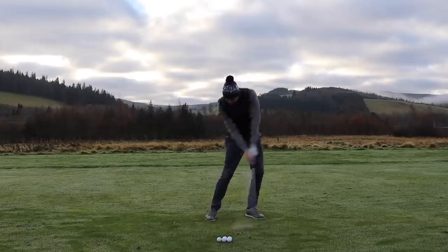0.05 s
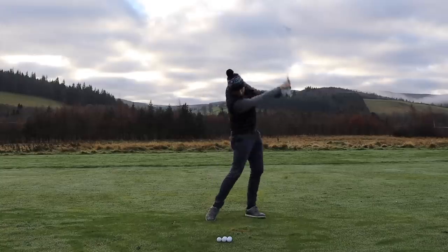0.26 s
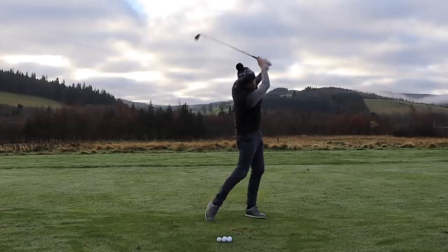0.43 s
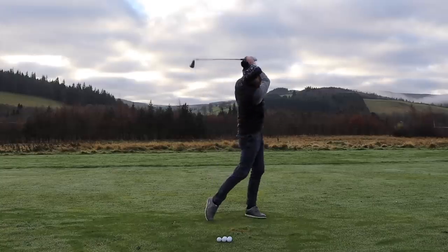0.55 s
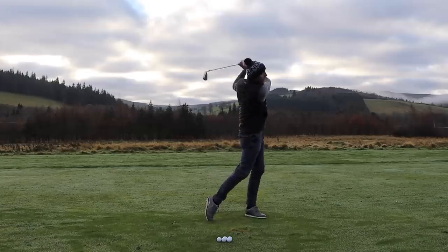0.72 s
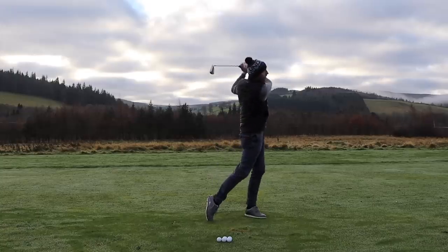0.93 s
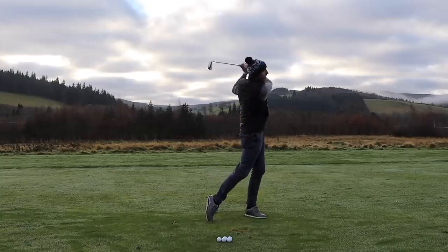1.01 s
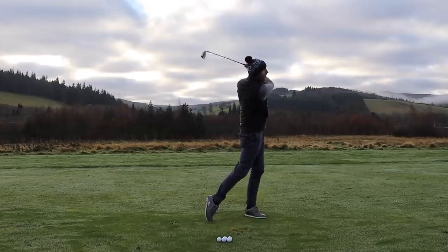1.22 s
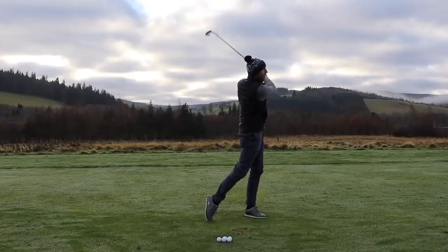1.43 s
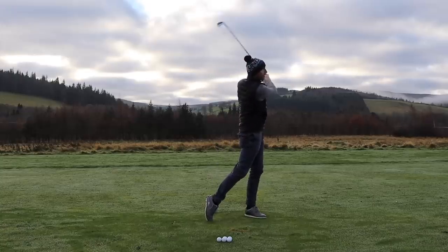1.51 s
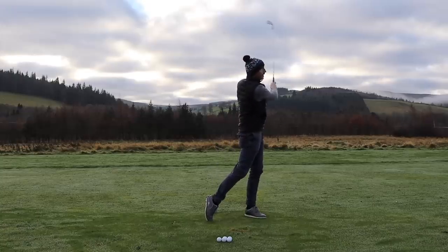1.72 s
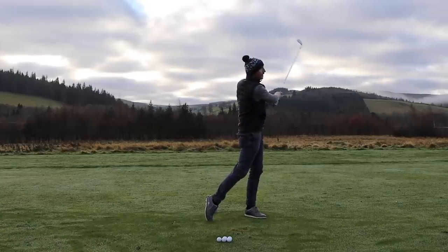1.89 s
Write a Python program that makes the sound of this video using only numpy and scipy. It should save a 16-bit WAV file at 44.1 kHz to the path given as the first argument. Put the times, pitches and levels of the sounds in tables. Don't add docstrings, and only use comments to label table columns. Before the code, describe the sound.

A golf iron cracks sharply into a ball and rips turf, with jacket rustle around it.

```python
import sys
import numpy as np
from scipy import signal
from scipy.io import wavfile
from scipy.ndimage import uniform_filter1d

SR = 44100
rng = np.random.default_rng(int(sys.argv[2]) if len(sys.argv) > 2 else 0)


def unload_audio(sound):
    columns = np.transpose(np.atleast_2d(sound))
    steps = np.round(np.clip(columns, -1, 1) * 32767)
    wavfile.write(sys.argv[1], SR, steps.astype(np.int16))


def how_loud(loudness_db):
    steps = np.asarray(loudness_db, float) / 20
    return 10 ** steps


N = 85995


def noise(n=N):
    return rng.standard_normal(n)


def evened(x):
    return x / np.sqrt(np.mean(x ** 2) + 1e-20)


def along(table, column):
    t_s, values = np.array(table)[:, [0, column]].T
    return np.interp(np.arange(N) / SR, t_s, values)


def add(mix, start_s, sound):
    part = mix[round(start_s * SR):][:len(sound)]
    part += sound[:len(part)]


def passed(x, hz, kind):
    b, a = signal.butter(2, hz, kind, fs=SR)
    return signal.lfilter(b, a, x)


def coloured(x, points, patchy_db=0., size=512):
    overlap = size * 3 // 4
    hz, _, z = signal.stft(x, SR, nperseg=size, noverlap=overlap)
    point_hz, point_db = np.transpose(points)
    shape_db = np.interp(np.log(hz + 1), np.log(point_hz + 1), point_db)
    patches = uniform_filter1d(rng.standard_normal(z.shape), size=6, axis=0)
    patches = evened(uniform_filter1d(patches, size=16, axis=1))
    z = z * how_loud(shape_db[:, None] + patchy_db * patches)
    return evened(signal.istft(z, SR, nperseg=size, noverlap=overlap)[1][:len(x)])


def resonate(x, hz, width_hz):
    carrier = np.exp(2j * np.pi * np.cumsum(hz) / SR)
    pole = np.exp(-np.pi * width_hz / SR)
    smooth = signal.lfilter([1 - pole], [1, -pole], x / carrier)
    return 2 * (carrier * smooth).real


def road():
    # f/Hz, level/dB
    tyre_spectrum = [(30, -38.5), (100, -9.5), (190, -21), (520, -18.5), (730, -5.5), (980, -5),
                     (1450, -25), (5000, -59)]
    # f/Hz, level/dB
    air_spectrum = [(500, -40.5), (1500, -7), (2300, -10.5), (3600, 1.5), (7000, -6), (12000, -14.5),
                    (15800, -27)]
    tyres = coloured(noise(), tyre_spectrum, patchy_db=0.24, size=2048)
    air = coloured(noise(), air_spectrum, patchy_db=2.25)
    return how_loud(-53.5) * tyres + how_loud(-65.5) * air


def jacket():
    # t/s, rustle level/dB, heavy-fold share/dB, crispness/dB
    body_turn = [(0, -48, 8, 1), (.05, -46.5, 0, 2.5), (.115, -35, -3.5, 0.5), (.15, -36, 4.5, 3),
                 (.205, -35.5, 0, 5.5), (.24, -33, -1, -3.5), (.3, -39.5, -1.6, 2.2), (.38, -37.5, -1, 1),
                 (.47, -36.5, -4.5, 1), (.57, -41.5, -6, 2.5), (.67, -44, -3.5, 2), (.73, -52.5, -0.8, -1),
                 (.86, -60.5, 3, -0.7), (.93, -54.5, -1, 6), (1.05, -69.5, 2, 3), (1.28, -58.5, 2.5, 3),
                 (1.5, -55, -3, -2), (1.95, -57, -1.2, -4)]
    # f/Hz, level/dB
    rustle_spectrum = [(410, -24.5), (700, -6.5), (1190, -4.5), (1660, -4), (1810, -4.5), (2180, -3),
                       (5280, -5), (8340, -13.5), (15800, -29)]
    # f/Hz, level/dB
    fold_spectrum = [(18, -56), (30, -29), (162, 0), (205, -10), (494, -2), (653, -11.5), (1000, -6.5),
                     (1300, -34.5), (2200, -120)]
    crinkles_per_s, spread_db, crinkle_db = 1100, 5, -9
    folds_db, crisp_hz = -2.5, 6500

    hits = rng.random(N) < crinkles_per_s / SR
    size = np.minimum(rng.exponential(1, N), 4)
    crinkles = evened(hits * how_loud(spread_db * size) * rng.choice([-1., 1.], N))
    hiss = coloured(noise() + how_loud(crinkle_db) * crinkles, rustle_spectrum, patchy_db=1.1)
    crisp = passed(hiss, crisp_hz, "high")
    hiss = hiss + (how_loud(along(body_turn, column=3)) - 1) * crisp
    folds = coloured(noise(), fold_spectrum, size=1024)
    folds = how_loud(folds_db + along(body_turn, column=2)) * folds
    return how_loud(along(body_turn, column=1)) * (hiss + folds)


def snaps():
    # t/s, peak/dB, f/Hz, t60/s
    snap_events = [(.009, -27.5, 4500, 0.015), (.009, -13.5, 5580, 0.0027), (.009, -31, 7100, 0.0045),
                   (.0092, -19.5, 1670, 0.0027), (.1695, -21, 2800, .005), (.1711, -23.5, 1900, 0.013),
                   (.174, -10, 4500, 0.0033), (.2222, -25, 2990, .005), (.2372, -17.5, 2390, 0.0073),
                   (.2765, -23, 4500, .004), (.842, -40, 3000, .003)]
    out = np.zeros(N)
    t = np.arange(600) / SR
    for start_s, db, hz, t60_s in snap_events:
        grit = resonate(noise(len(t)), np.full(len(t), hz), hz / 2)
        ring = np.minimum(1.6 * t * hz, 1) * np.sin(2 * np.pi * hz * t)
        add(out, start_s, how_loud(db - 60 * t / t60_s) * (0.9 * grit - ring))
    return out


def shaft():
    # t/s, whistle f/Hz, level/dB
    swing = [
        (.05, 134, -65),
        (.09, 168, -45.5),
        (.125, 338.4, -39),
        (.15, 497, -34.5),
        (.178, 613, -32),
        (.2, 389.5, -33.5),
        (.23, 330, -35),
        (.26, 260, -40.5),
        (.3, 200, -68),
    ]
    whistle_width_hz, roar_width_hz, roar_db = 120, 660, -4.5
    hz = along(swing, column=1)
    whistle = resonate(noise(), hz, whistle_width_hz)
    whistle = evened(resonate(whistle, hz, whistle_width_hz))
    roar = resonate(noise(), 0.8 * hz, roar_width_hz)
    roar = evened(resonate(roar, 1.3 * hz, roar_width_hz))
    return how_loud(along(swing, column=2)) * (whistle + how_loud(roar_db) * roar)


def thumps():
    # t/s, peak/dB, f/Hz, length/cycles
    pushes = [(0.1814, -35, 1100, 1.), (0.1861, -10.5, 600, 0.85), (0.1863, -14, 350, 2.8),
              (.1923, -8, 500, 1), (0.2453, -18.5, 395, 2.6), (.18, -20, 160.6, 3.), (.24, -30.5, 113, 3.),
              (.13, -33, 109, 3.), (0.444, -38, 152, 4.), (1.68, -43, 1250, 4.8), (1.724, -37, 650, 1.5)]
    out = np.zeros(N)
    for start_s, db, hz, cycles in pushes:
        t = np.arange(0, cycles / hz, 1 / SR)
        swell = np.sin(np.pi * t * hz / cycles) ** 1.3
        add(out, start_s, -how_loud(db) * swell * np.sin(2 * np.pi * hz * t))
    return out


def strike():
    # f/Hz, level/dB, delay/s, swell/s
    modes = [(1053, -9.5, 0.0022, .0018), (1632, 4.5, 0.0011, .0012), (2148, 8.5, 0.0014, .0015),
             (2950, -1, 0.00077, .0011), (3280, 1, 0.0018, 0.00071), (3660, 6, 0.0012, .0018),
             (4200, -5, 0.0022, 0.0016), (5620, -8, 0.0037, 0.0021), (7330, -8.5, 0.004, .0012),
             (13490, -11, 0.0049, .001)]
    hit_s = .1814
    crack_db, crack_s, crack_top_hz = -3.5, .0035, 9500
    out = np.zeros(N)
    t = np.arange(1300) / SR
    for hz, db, delay_s, swell_s in modes:
        u = t / swell_s
        add(out, hit_s + delay_s, -how_loud(db) * u * np.exp(1 - u ** 2.2) * np.sin(2 * np.pi * hz * t))
    crack = passed(noise(len(t)), crack_top_hz, "low") * np.exp(-(t / crack_s) ** 2.5)
    add(out, hit_s + .0005, how_loud(crack_db) * crack)
    return out


def divot():
    # f/Hz, level/dB
    turf_spectrum = [(200, -11.5), (700, -10.5), (1200, -8), (1900, -2.5), (2700, -9.5), (4000, -0.5),
                     (7500, -12), (15800, -30.5)]
    dig_s, length_s, dull_hz = .1857, 0.011, 4500
    level_db, fade_db = -9, -5
    out = np.zeros(N)
    u = np.arange(2048) / SR / length_s
    rip = coloured(noise(len(u)), turf_spectrum)
    late = np.clip(u, 0, 1) ** 3.4
    rip = (1 - late) * rip + late * passed(rip, dull_hz, "low")
    add(out, dig_s, rip * how_loud(level_db + fade_db * u) * np.exp(-u ** 6))
    return out


def ticks():
    # t/s, peak/dB, top f/Hz
    tick_events = [(0.2225, -20, 13800), (0.2338, -16, 9000), (.2435, -21, 14000), (.758, -38, 15000),
                   (.875, -44, 15000), (0.901, -41.5, 13950), (1.245, -46.5, 13970), (1.354, -43, 12030),
                   (1.494, -36.5, 7050), (1.643, -41, 9100), (1.685, -47, 13840), (1.78, -46.5, 14000),
                   (1.931, -50.5, 9130)]
    out = np.zeros(N)
    impulse = np.eye(1, 200)[0]
    for start_s, db, top_hz in tick_events:
        tick = passed(passed(impulse, top_hz, "low"), 900, "high")
        add(out, start_s, -how_loud(db) * tick / abs(tick).max())
    return out


def scene():
    background = road() + jacket()
    swing = shaft() + strike() + divot()
    debris = snaps() + thumps() + ticks()
    return (background + swing + debris)[None]


def roll_off(x):
    return signal.sosfilt(signal.butter(12, 21850, fs=SR, output="sos"), x)


def record(dry):
    low_cut_hz, edge_hz = 45, 15800
    clipped = np.clip(passed(dry, low_cut_hz, "high"), -1, 1)
    band_limit = signal.firwin(301, edge_hz, window=("kaiser", 8), fs=SR)
    mix = signal.oaconvolve(clipped, band_limit[None], "same")
    return roll_off(mix)


dry = scene()
out = record(dry)
unload_audio(out)
```